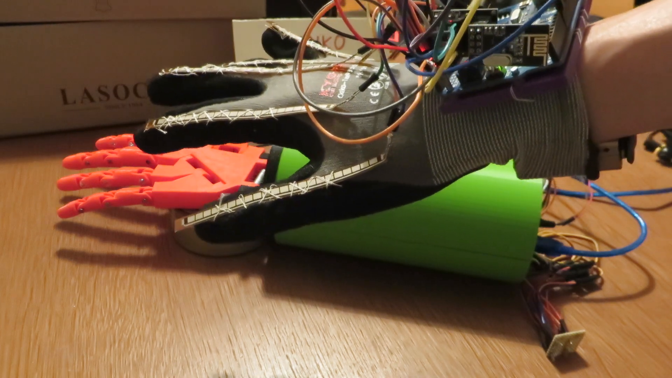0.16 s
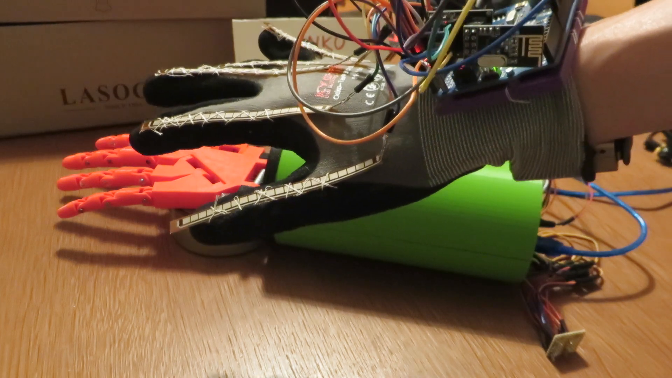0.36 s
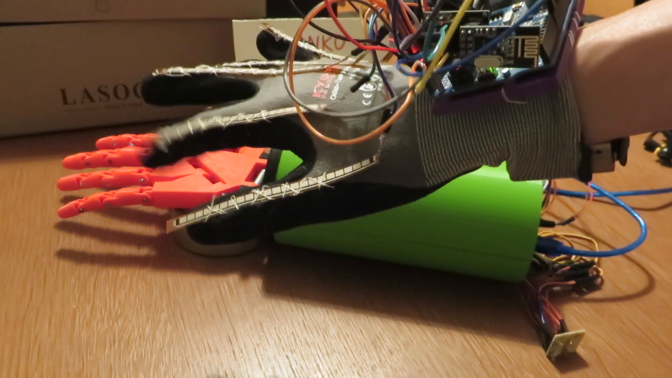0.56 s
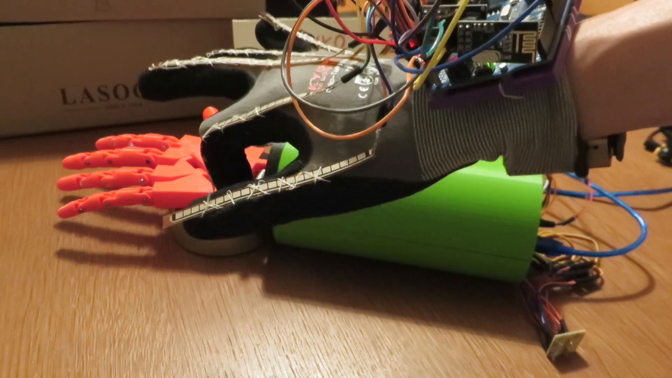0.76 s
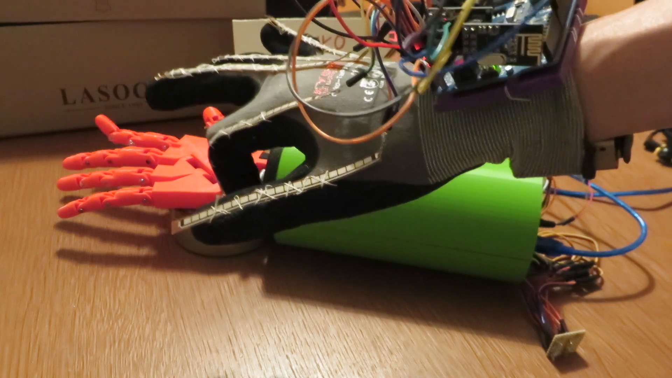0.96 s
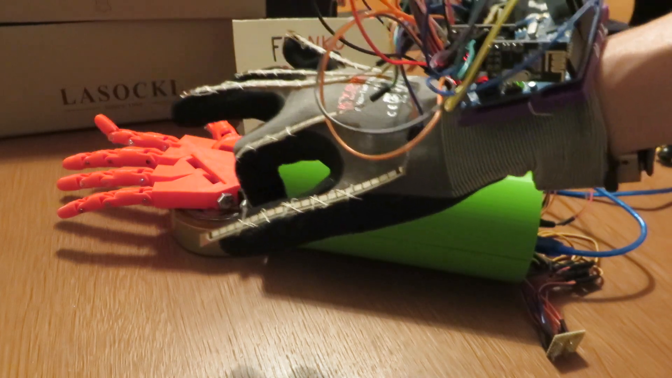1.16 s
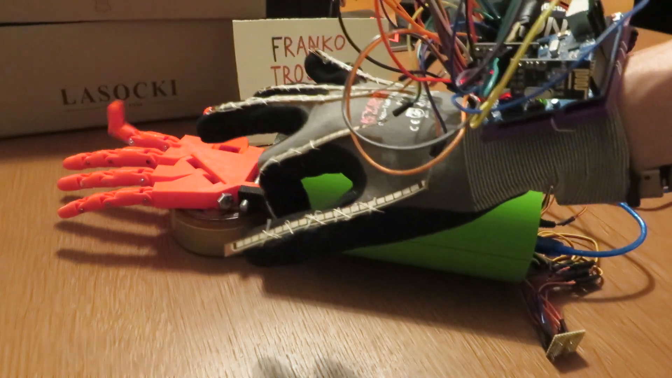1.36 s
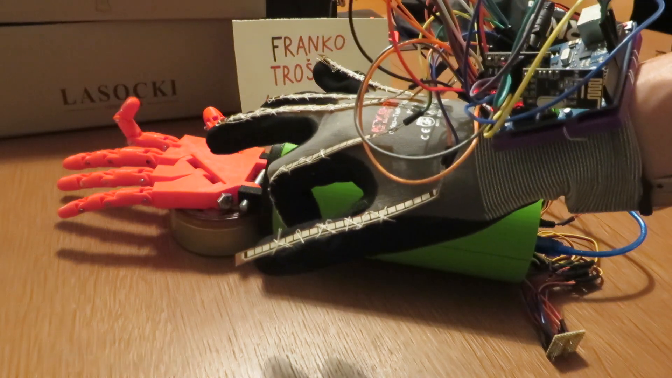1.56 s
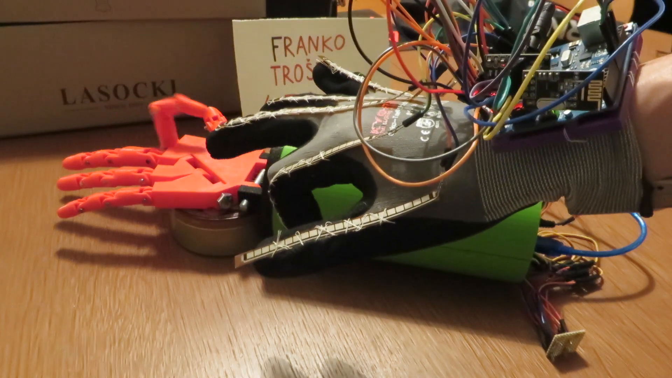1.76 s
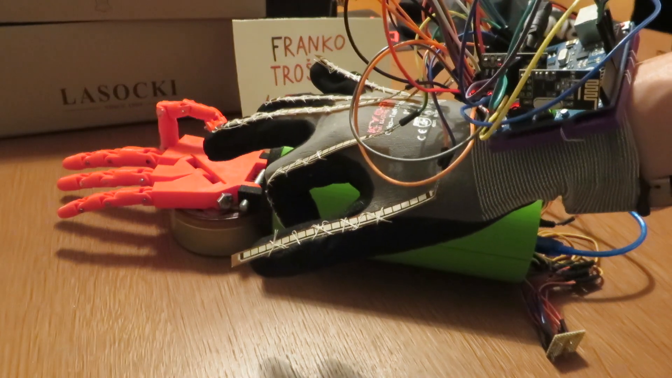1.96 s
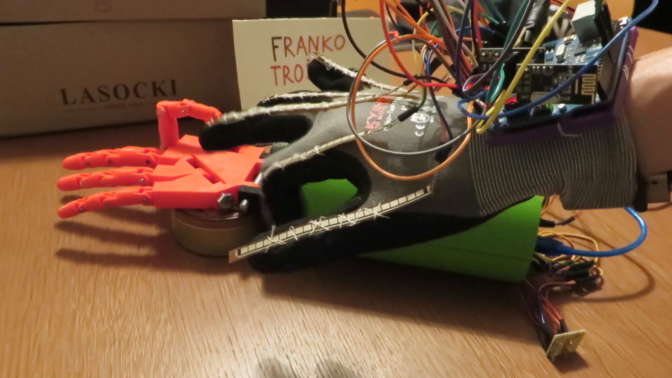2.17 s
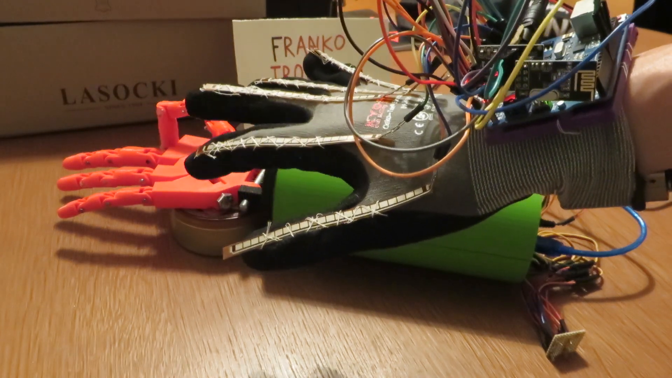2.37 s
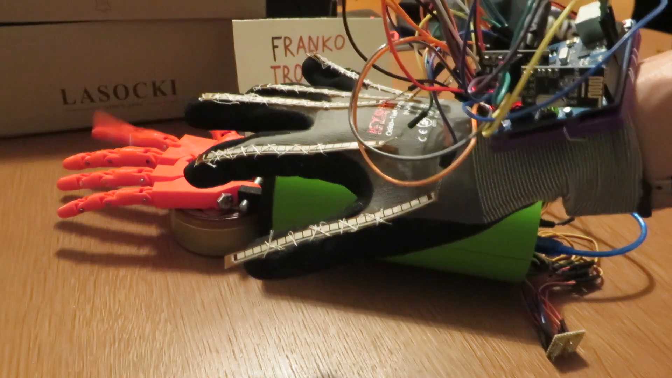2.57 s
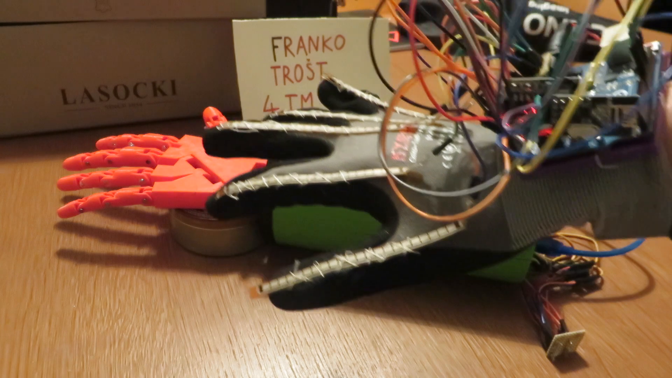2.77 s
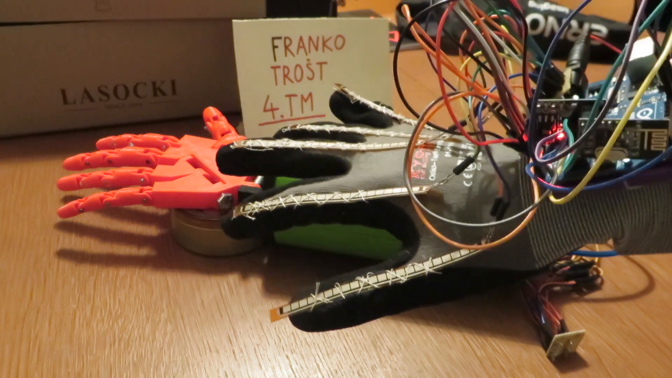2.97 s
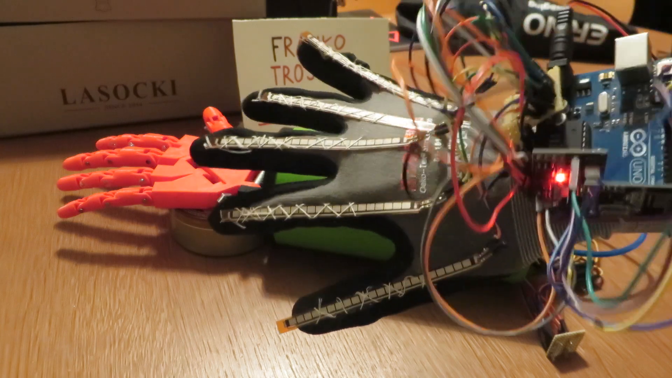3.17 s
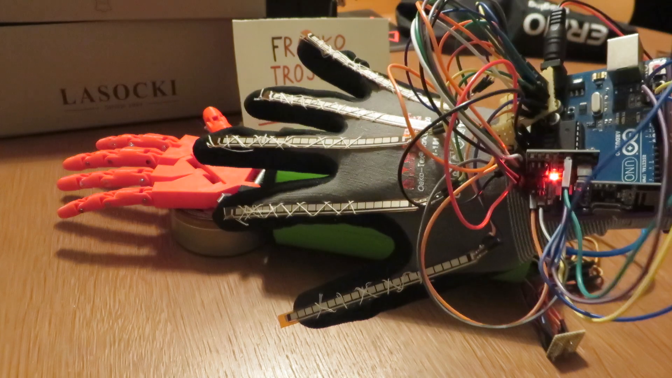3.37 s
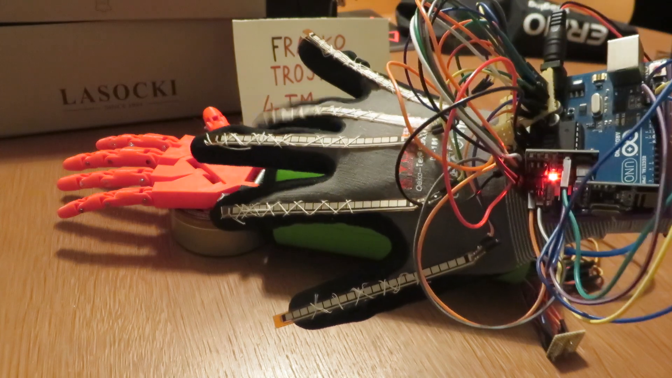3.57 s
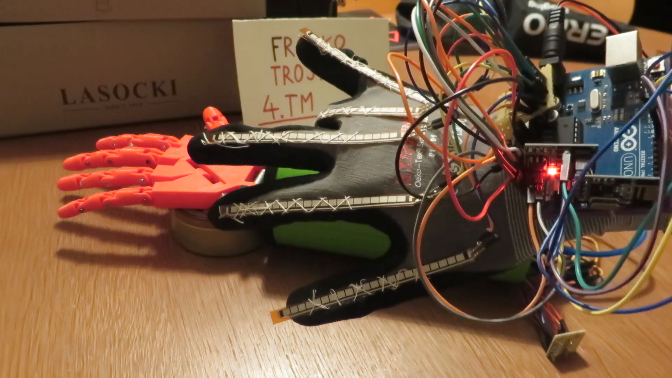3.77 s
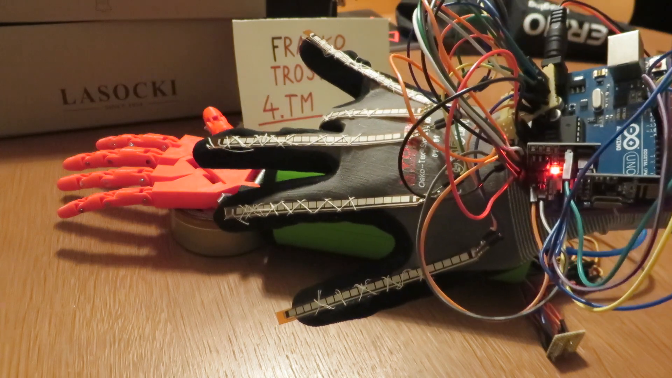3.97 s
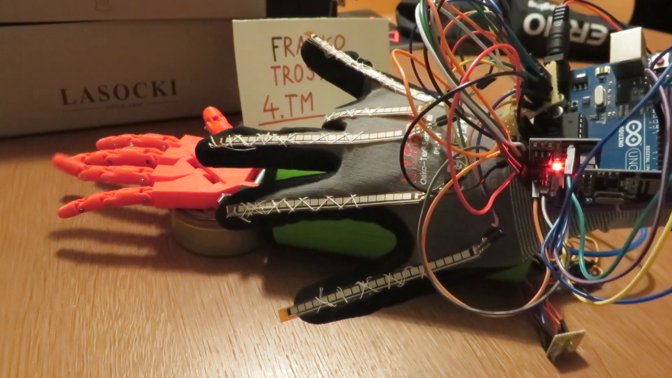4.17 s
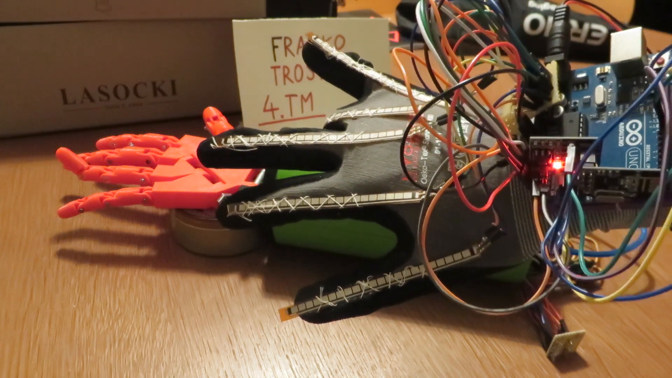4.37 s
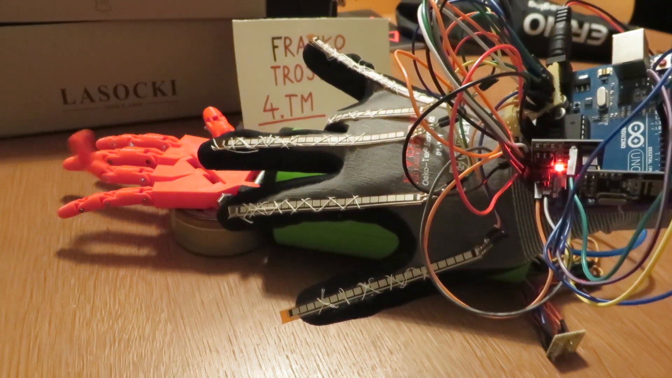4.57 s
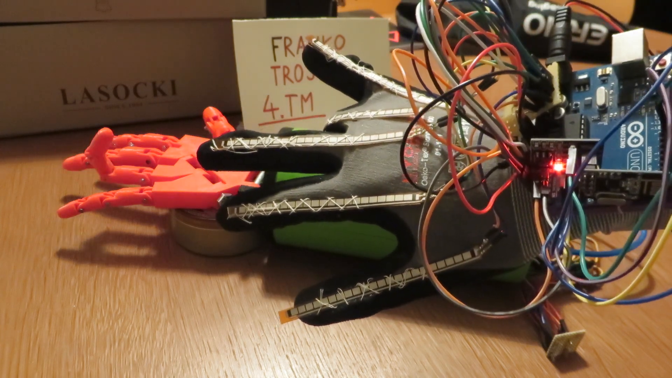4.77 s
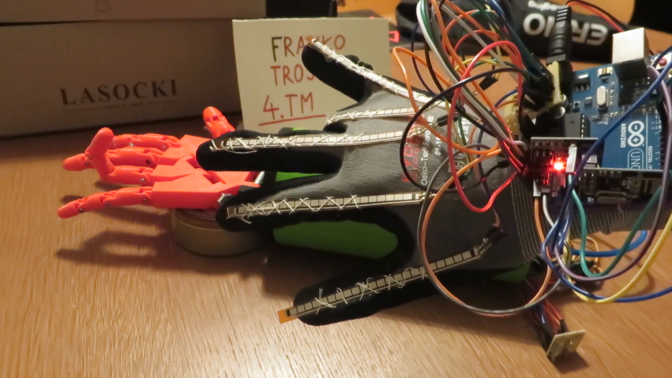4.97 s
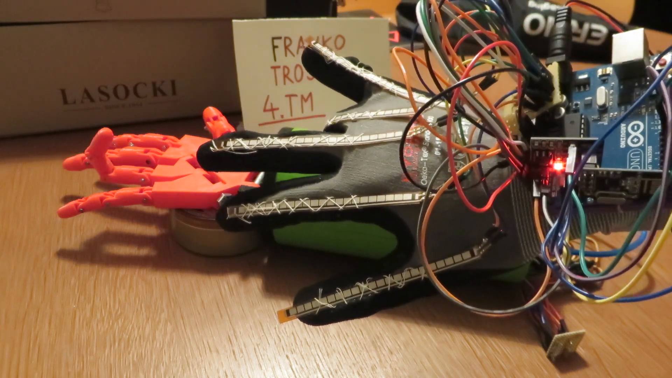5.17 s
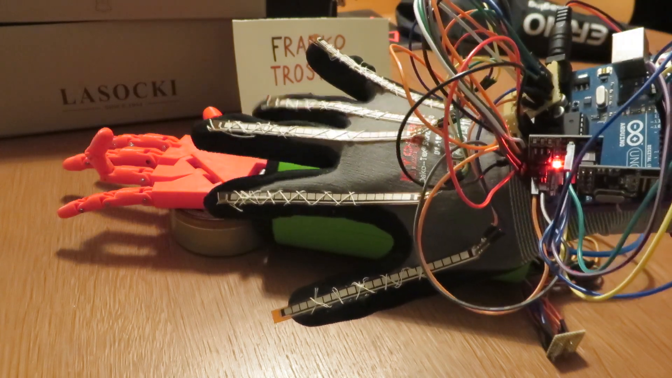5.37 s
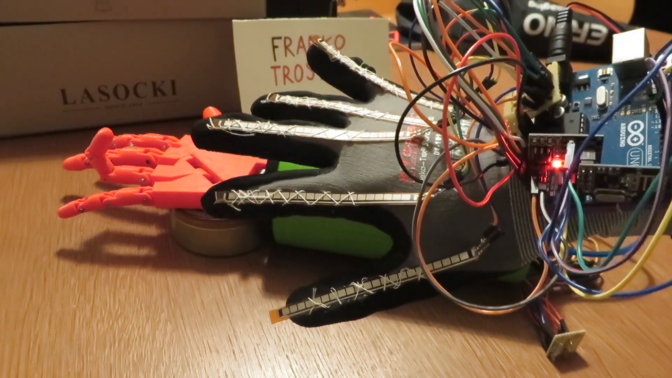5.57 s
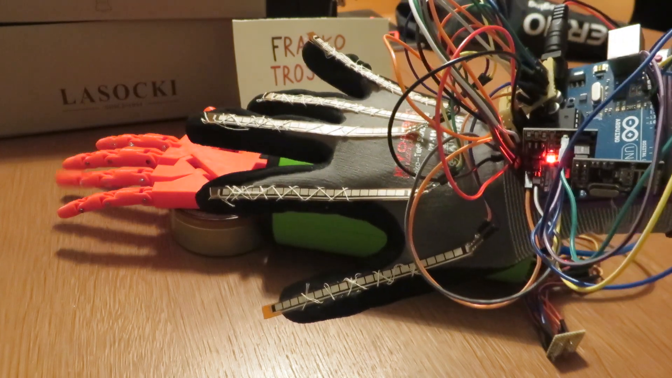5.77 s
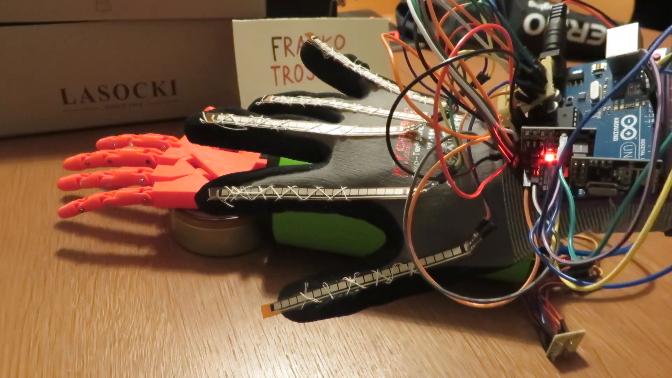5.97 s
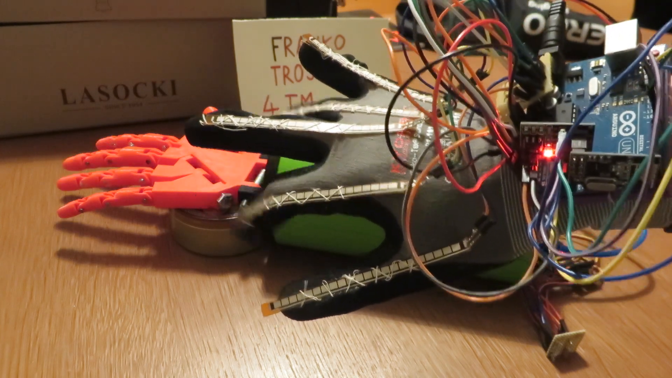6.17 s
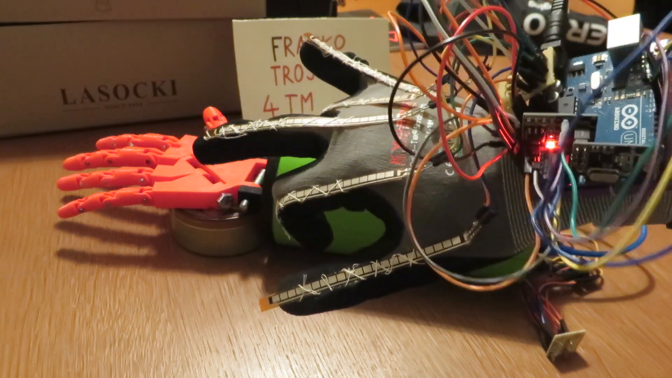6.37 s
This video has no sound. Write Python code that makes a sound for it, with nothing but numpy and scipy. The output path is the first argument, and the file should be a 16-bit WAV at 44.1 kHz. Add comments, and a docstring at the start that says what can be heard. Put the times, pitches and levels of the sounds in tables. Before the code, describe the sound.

Short gritty servo whirs with high whines move plastic fingers that clack at their stops, separated by faint ticks, in a humming small room.

```python
"""A plastic robot hand on a desk in a small room, heard through two microphone ports over wide, humming room noise.
First its servos only tick and twitch: short noise bursts, as each motor kicks against its gear play.
From 0.92 s they pull the fingers in seven short moves, each a rasp of gear teeth with a whine at the mesh rate,
while sliding tendons rattle the hollow forearm and fingers knock at their stops; ticks fall between the moves.
The hardest knocks, near 2.67 s, make the gain duck and slowly recover; the last move starts at 5.69 s."""
import sys
import numpy as np
from scipy import signal
from scipy.fft import rfft, irfft
from scipy.io import wavfile

SR = 44100
rng = np.random.default_rng(int(sys.argv[2]) if len(sys.argv) > 2 else 0)


def pcm_store(signal):
    """Save signal as 16-bit PCM."""
    levels = np.round(np.clip(np.atleast_2d(signal), -1, 1) * 32767)
    wavfile.write(sys.argv[1], SR, levels.astype(np.int16).T)


N = 282663  # samples, 6.4 s
TIME = np.arange(N) / SR
BINS = np.fft.rfftfreq(N, 1 / SR)


def amp(db):
    """Decibels to gain."""
    return 10 ** (np.asarray(db) / 20)


def unit(x):
    """Scales to an rms of 1."""
    return x / np.sqrt(np.mean(x ** 2) + 1e-20)


def read(points, hz):
    """Reads a table on a log-frequency axis."""
    f, value = np.transpose(points)
    return np.interp(np.log(hz + 1), np.log(f + 1), value)


def add(mix, s, sound):
    """Mixes a sound in at time s, in seconds."""
    part = mix[max(round(s * SR), 0):][:len(sound)]
    part += sound[:len(part)]


def colour(x, spectrum, size=2048):
    """Causal (minimum-phase) filter of unit energy with the given spectrum."""
    hz = abs(np.fft.fftfreq(size, 1 / SR))
    log_gain = np.log(amp(np.maximum(read(spectrum, hz), -100)))
    taps = np.fft.ifft(np.exp(np.conj(signal.hilbert(log_gain)))).real
    return signal.oaconvolve(x, taps / np.linalg.norm(taps))[:N]


def wander(rate_hz):
    """Smooth random drift of rms 1: noise that fades out above about the given rate."""
    return unit(irfft(rfft(rng.standard_normal(N)) * np.exp(-(BINS / rate_hz) ** 2), N))


def grains(per_s, spread_db):
    """Random impacts of uneven size, rms 1."""
    size = rng.standard_normal(N) * amp(spread_db * rng.standard_normal(N).clip(-2, 2))
    return unit(size * (rng.random(N) < per_s / SR))


def envelope(start, length, attack_s, release_s):
    """Rises from the start, holds until the given length has passed, then dies away."""
    t = TIME - start
    return np.clip(t / attack_s, 0, 1) * np.exp(-np.maximum(t - length, 0) / release_s)


# Spectrum of the room noise. Each row: frequency in Hz, relative level in dB per Hz.
AIR_SPECTRUM = [(15, -49), (25, -16), (103, -3.5), (146, -7), (191, -6.5), (250, -8), (354, -8.5),
                (501, -11), (588, -4.5), (927, -12.5), (1090, -9.5), (1310, -12), (4500, -16),
                (12100, -32.5), (15000, -68)]
# Stereo width of the room noise. Each row: frequency in Hz, side minus mid in dB.
AIR_SIDE = [(60, -12), (110, -0.5), (200, 6.5), (380, 7.5), (700, 6), (1290, 2.5), (2380, -5), (4400, -8),
            (8120, -5), (15000, 0)]
# Steady hums in the room. Each row: centre in Hz, width at half amplitude in Hz, level in the mid in dB.
ROOM_HUMS = [(101, 4.5, -62.5), (589, 26, -64), (1109, 29, -63)]


def air(hiss_db=-47.44):
    """Wide, steady room noise; each hum is a narrow peak in its spectrum."""
    mid, side = rfft(rng.standard_normal((2, N)))
    shape = amp(hiss_db) * unit(amp(read(AIR_SPECTRUM, BINS)))
    for hz, width, db in ROOM_HUMS:
        peak = unit(1 / (1 + (2 * (BINS - hz) / width) ** 2))
        shape = np.hypot(shape, amp(db) * peak)
    mid = irfft(mid * shape, N)
    side = irfft(side * shape * amp(read(AIR_SIDE, BINS)), N)
    return np.array([mid + side, mid - side])


# A servo kicks against its gear play. Each row: start in seconds, level in dB before the tick trim.
SERVO_TICKS = [(0.0334, -32), (2.0482, -34.5), (2.2079, -31.5), (3.0152, -29), (3.275, -37.5),
               (3.5374, -36.5), (3.5957, -34.5), (3.7561, -31.5), (3.8147, -39), (3.902, -36),
               (4.0591, -30.5), (4.0995, -29), (5.264, -32.5)]
# A motor turns for an instant. Each row: start in seconds, length in seconds,
# opening kick in dB before the tick trim, whirr level in dB.
MOTOR_TWITCHES = [(0.0803, 0.051, -31, -31), (0.142, 0.038, -25.5, -33), (0.262, 0.027, -31, -30),
                  (0.606, 0.017, -29, -35.5), (0.806, 0.023, -29, -39), (3.107, 0.043, -47, -43),
                  (3.159, 0.074, -50, -46.5)]
# Spectrum of a ticking servo. Each row: frequency in Hz, relative level in dB per Hz.
TICK_SPECTRUM = [(1470, -34.5), (2500, -7), (3200, -11.5), (3500, -1), (4350, 1), (4800, 5.5), (5530, 0.5),
                 (6190, 2.5), (7700, 1.5), (12600, -14), (15000, -37)]
PLAY_S = 0.0026  # from the kick until the gears turn


def ticks(tick_db=-4.5, ring_s=0.0055, rebound=0.15, settle_s=0.034, idle_db=-60):
    """Kicks and twitches are decaying noise; servos holding their place add a faint chatter of impacts."""
    t = np.arange(SR // 8) / SR
    force = np.zeros(N)
    # every twitch and every move opens with a kick
    twitch_kicks = [(s, db) for s, _, db, _ in MOTOR_TWITCHES]
    move_kicks = [(s, db) for s, _, _, _, db, _, _ in SERVO_MOVES]
    decay = np.exp(-t / ring_s) + rebound * np.exp(-t / settle_s)
    for s, db in SERVO_TICKS + twitch_kicks + move_kicks:
        add(force, s, amp(db + tick_db) * decay)
    for s, length, _, db in MOTOR_TWITCHES:
        u = 4 * t / length  # the whirr peaks a quarter of the way through
        add(force, s + PLAY_S, amp(db) * u * np.exp(1 - u))
    chatter = amp(idle_db) * grains(160, 3.5)
    return colour(force * rng.standard_normal(N) + chatter, TICK_SPECTRUM)


# A servo moves a finger. Each row: start in seconds, length in seconds, run-up in seconds, top gear mesh rate
# in Hz before the sag, opening kick in dB before the tick trim, then tooth rasp and whine in dB before their trims.
SERVO_MOVES = [(0.924, 0.1, 0.026, 5343, -30, -24, -30), (1.385, 0.091, 0.036, 5300, -42, -23.5, -26.5),
               (1.669, 0.11, 0.036, 4800, -36, -25, -26.5), (2.4733, 0.21, 0.033, 4650, -26, -22, -28),
               (4.076, 0.226, 0.05, 4800, -36, -36, -27.5), (4.56, 0.13, 0.035, 4630, -31, -37.5, -44),
               (5.6868, 0.24, 0.048, 4707, -32, -34.5, -38.5)]
START_SHARE = 0.68  # share of its top speed at which a motor is first heard
# the tightening tendon takes this share of the speed over the last part of a move, up to twice it in the coast
SAG_SHARE, SAG_PART = 0.08, 0.3
COAST_S, WHINE_STOP_S = 0.015, 0.00495  # once the power is cut the rasp dies more slowly than the whine
HOUSING_HZ, HOUSING_WIDTH_HZ = 4556, 680  # the whine is loudest near this resonance of the servo case
# the whine swells as the motor reaches speed; place and width in run-up times
SURGE_DB, SURGE_AT, SURGE_WIDTH = 5, 1.45, 0.45


def drive():
    """Mesh rate, rasp and whine: a motor runs up, sags as its tendon tightens, and coasts to rest."""
    speed, grind, sing = np.full(N, float(HOUSING_HZ)), np.zeros(N), np.zeros(N)
    for start, length, run_up, top_hz, _, rasp_db, whine_db in SERVO_MOVES:
        t = np.maximum(TIME - start, 0)
        run = 1 - (1 - START_SHARE) * np.exp(-(t / run_up) ** 1.5)
        tension = np.clip(1 + (t / length - 1) / SAG_PART, 0, 2)
        speed = np.where(TIME >= start, top_hz * run * (1 - SAG_SHARE * tension), speed)
        surge_db = SURGE_DB * np.exp(-((t / run_up - SURGE_AT) / SURGE_WIDTH) ** 2)
        grind += amp(rasp_db) * envelope(start, length, run_up, COAST_S)
        sing += amp(whine_db + surge_db) * envelope(start, length, run_up, WHINE_STOP_S)
    resonance = 1 / np.hypot(1, 2 * (speed - HOUSING_HZ) / HOUSING_WIDTH_HZ)
    return speed, grind, sing * resonance


# Spectrum of the rasping gearbox. Each row: frequency in Hz, relative level in dB per Hz.
GEARBOX_SPECTRUM = [(250, -44), (500, -17.5), (830, -4), (1300, -7), (1900, -14), (2300, -6.5),
                    (3300, -7.5), (4500, 0.5), (6000, -3.5), (7300, 1), (8500, -3.5), (10100, -10.5),
                    (12100, -10.5), (14200, -43)]


def servos(rasp_db=-2, whine_db=-2, half_db=-23, double_db=-23, jitter=.011, fray=.08,
           orders_db=-3, shake_db=2.3, waver_db=3.5, teeth_count=10):
    """Gear teeth strike unevenly and ring the gearbox; their steady part is the whine, which frays under load."""
    mesh_hz, grind, sing = drive()
    speed = mesh_hz * (1 + jitter * wander(49.6))
    shaft = 2 * np.pi * np.cumsum(speed) / SR / teeth_count
    # unequal teeth repeat with the shaft: lines that glide through the gearbox resonances and come and go
    orders = np.zeros(N)
    for k in range(4, 26):
        orders += np.cos(k * shaft + 2 * np.pi * rng.random()) * (1 + 0.94 * wander(64))
    # teeth bite hardest once in each turn of the motor shaft
    bite = (1 + 0.26 * np.cos(shaft)) * amp(shake_db * wander(113))
    strikes = rng.standard_normal(N) + amp(orders_db) * unit(orders)
    rasp = colour(unit(bite * strikes), GEARBOX_SPECTRUM)
    # a loaded gear rattles within its play, which smears the mesh tone
    load = grind / (grind + sing + 1e-9)
    mesh = 2 * np.pi * np.cumsum(speed * (1 + fray * load ** 2 * wander(351))) / SR
    whine = np.sin(mesh) + amp(half_db) * np.sin(mesh / 2) + amp(double_db) * np.sin(2 * mesh)
    whine = unit(whine * amp(waver_db * wander(55)) * (1 + load ** 2 * np.cos(shaft)))
    return amp(rasp_db) * rasp * grind + amp(whine_db) * whine * sing


# Tendons and finger joints slide. Each row: start in seconds, length in seconds, level in dB before the slide trim.
TENDON_STROKES = [(0.965, 0.11, -35.5), (1.427, 0.086, -35), (1.682, 0.058, -37.5), (1.813, 0.14, -38.5),
                  (2.506, 0.15, -36), (4.215, 0.085, -37), (4.58, 0.22, -37.5), (5.734, 0.058, -36.5),
                  (5.784, 0.14, -29.5)]
# A finger hits its stop. Each row: start in seconds, thud in dB, crack in dB before the crack trim.
STOP_KNOCKS = [(1.497, -28.5, -45), (1.733, -23.5, -33), (1.915, -33, -46), (2.662, -14, -17),
               (2.6651, -19.5, -6.5), (2.69, -17, -8.5), (4.262, -27, -29), (4.719, -25, -26.5),
               (4.756, -28, -27), (5.807, -24, -23)]
# Spectrum of the hollow forearm. Each row: frequency in Hz, relative level in dB per Hz.
FOREARM_SPECTRUM = [(100, -44), (170, -10.5), (320, -1), (420, -3), (520, -4.5), (850, 0.5), (1300, -6),
                    (1900, -14), (3000, -11), (5000, -14.5), (9000, -84)]
# Spectrum of cracks and scrapes. Each row: frequency in Hz, relative level in dB per Hz.
CRACK_SPECTRUM = [(120, -43), (500, 3), (1000, -12), (1800, -20), (3000, -10), (5500, -8.5), (8000, 0),
                  (11000, -5), (14000, -21), (16000, -44)]
# Modes of the forearm on its stand and the desk. Each row: frequency in Hz, relative level in dB, t60 in seconds.
STAND_MODES = [(140.1, -3.5, 0.47), (181, 10, 0.16), (234.7, 5.5, 0.19), (311, -1, 0.17), (370, 6.5, 0.039),
               (518.6, 9.5, 0.21)]
TAKE_UP_S, SLACKEN_S = 0.013, 0.015  # a tendon takes up its slack, and lets go
JERK_DB, JERK_HZ = 2, 44.8  # it slides unevenly
RATTLE_DB, RATTLE_S = -13.5, 0.059  # loose joints rattle after each knock; level against its thud, before the trim


def fingers(slide_db=-3.5, scrape_db=-18, thud_s=0.0082, crack_db=2, crack_s=0.0014,
            stand_db=-2, heavy_db=-31):
    """Tendons slip in small jerks and fingers clatter on their stops; both sound through the hollow forearm."""
    t = np.arange(SR // 2) / SR
    thud, crack, slide, rattle = np.zeros((4, N))
    for s, low_db, high_db in STOP_KNOCKS:
        add(thud, s, amp(low_db) * np.exp(-t / thud_s))
        add(crack, s, amp(high_db + crack_db) * np.exp(-t / crack_s))
        rattle += amp(low_db + RATTLE_DB) * envelope(s, 0, thud_s, RATTLE_S)
    for s, length, db in TENDON_STROKES:
        slide += amp(db) * envelope(s, length, TAKE_UP_S, SLACKEN_S)
    pull = amp(slide_db) * np.hypot(slide * amp(JERK_DB * wander(JERK_HZ)), rattle)
    slips = grains(1800, 3.0) * pull
    force = slips + thud * grains(5000, 0.77)
    # heavy pulls rock the whole forearm on its stand; light ones hardly do
    ring = sum(amp(db - 60 * t / t60) * np.cos(2 * np.pi * hz * t) for hz, db, t60 in STAND_MODES)
    push = force * np.minimum(pull / amp(heavy_db), 1) ** 2
    rocking = signal.oaconvolve(push, ring / np.linalg.norm(ring))[:N]
    # so small a body radiates no deep bass
    body_band = signal.butter(2, [110, 900], "bandpass", fs=SR, output="sos")
    rocking = signal.sosfilt(body_band, rocking)
    clatter = colour(amp(scrape_db) * slips + crack * rng.standard_normal(N), CRACK_SPECTRUM)
    return colour(force, FOREARM_SPECTRUM) + amp(stand_db) * rocking + clatter


# Phase between the microphone ports. Each row: frequency in Hz, lead of the left in radians.
PORT_LEAD = [(150, 0.2), (500, 0.9), (1300, 1.3), (2200, -0.8), (4600, -0.62), (8000, -0.2), (13000, -0.3)]
# Level between the microphone ports. Each row: frequency in Hz, left minus right in dB.
PORT_LEVEL = [(300, -2), (1000, 10.5), (2500, 8), (4600, 2), (12000, 5)]


def ports(x):
    """Places the hand before the two microphone ports, by phase and level at each frequency."""
    turn = amp(read(PORT_LEVEL, BINS) / 2) * np.exp(.5j * read(PORT_LEAD, BINS))
    return irfft(rfft(x) * np.array([turn, 1 / turn]), N)


# Decay of the small room. Each row: frequency in Hz, t60 in seconds.
ROOM_DECAY = [(150, 0.55), (800, 0.42), (4500, 0.39), (7000, 0.34), (12000, 0.24)]


def room(x, tail_db=-3.0, desk_db=-13, desk_s=0.0056):
    """Quick reflections from the desk and boxes, then a tail whose treble dies first."""
    t = np.arange(SR // 2) / SR
    near, far = rng.standard_normal((2, 2, len(t))) * (rng.random((2, 2, len(t))) < 3000 / SR)
    hz, frame_s, z = signal.stft(far * (t > .007), SR, nperseg=256)
    decay = amp(-60 * frame_s / read(ROOM_DECAY, hz)[:, None])
    tail = signal.istft(z * decay, SR, nperseg=256)[1][:, :len(t)]
    desk = near * np.exp(-t / desk_s) * (t > .001)
    echo = np.zeros((2, len(t)))
    for db, part in [(tail_db, tail), (desk_db, desk)]:
        echo += amp(db) * part / np.linalg.norm(part, axis=1, keepdims=True)
    return signal.fftconvolve(x[None], echo, axes=1)[:, :N]


def scene():
    """The room noise, and the hand heard directly and by way of the room."""
    background = air()
    hand = ticks() + servos() + fingers()
    return background + ports(hand) + room(hand)


def record(dry, limit_db=-17, recover_db_per_s=9, squeeze=0.63, edge_hz=15850):
    """Gain control ducks after a loud peak and recovers slowly; then full scale and the band limit."""
    power = signal.lfilter(np.ones(128) / 128, 1, (dry ** 2).mean(0))
    power_db = 10 * np.log10(abs(power) + 1e-12)
    # the peak level is held, then falls at a steady rate
    fall = TIME * recover_db_per_s
    held_db = np.maximum.accumulate(power_db + fall) - fall
    over_db = np.maximum(held_db - limit_db, 0)
    duck_db = squeeze * signal.lfilter(np.ones(200) / 200, 1, over_db)
    low_pass = signal.firwin(511, edge_hz, window=("kaiser", 9), fs=SR)
    return signal.oaconvolve(np.clip(dry / amp(duck_db), -1, 1), low_pass[None], "same")


dry = scene()
out = record(dry)
pcm_store(out)
```